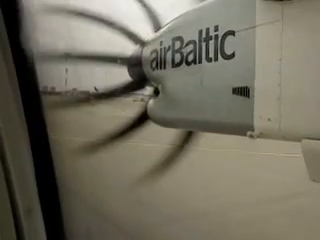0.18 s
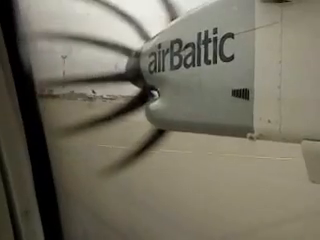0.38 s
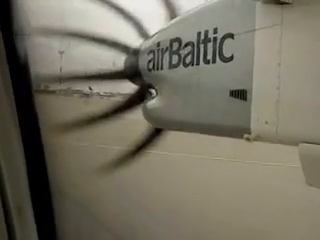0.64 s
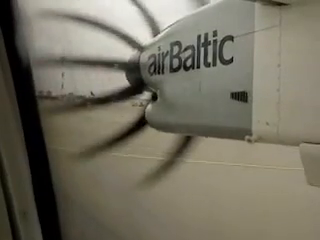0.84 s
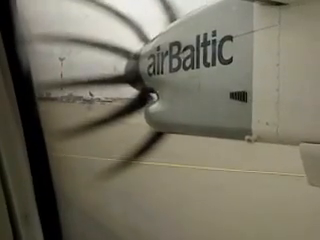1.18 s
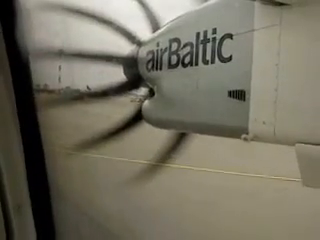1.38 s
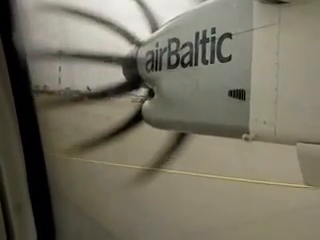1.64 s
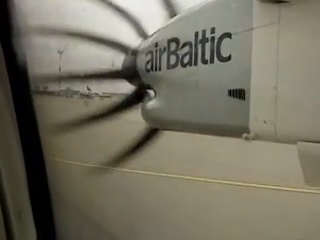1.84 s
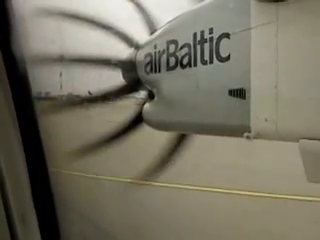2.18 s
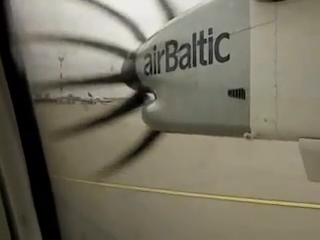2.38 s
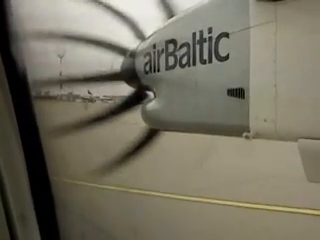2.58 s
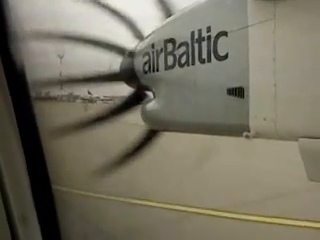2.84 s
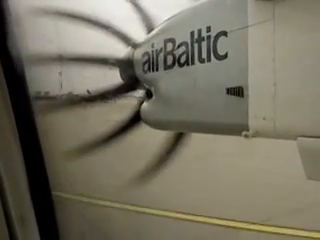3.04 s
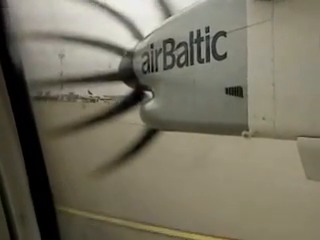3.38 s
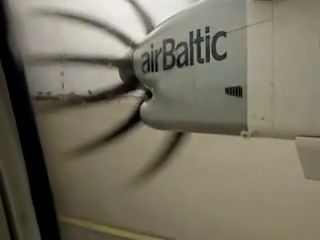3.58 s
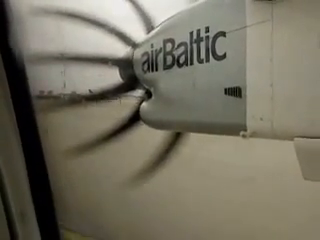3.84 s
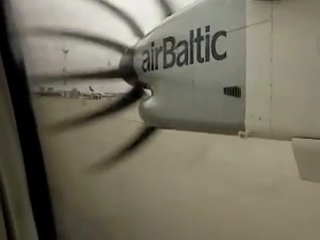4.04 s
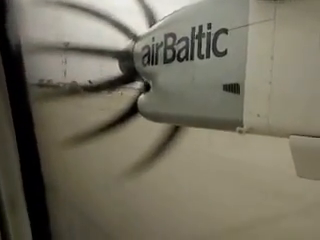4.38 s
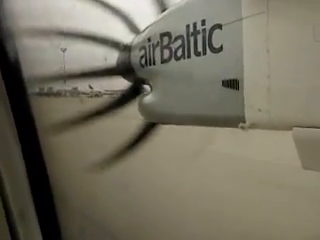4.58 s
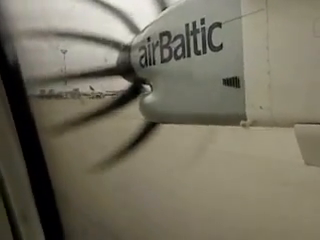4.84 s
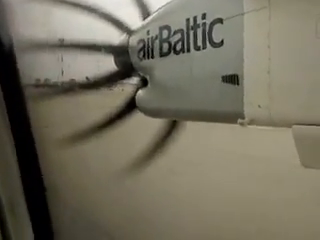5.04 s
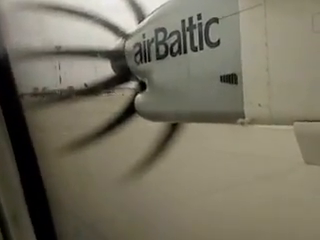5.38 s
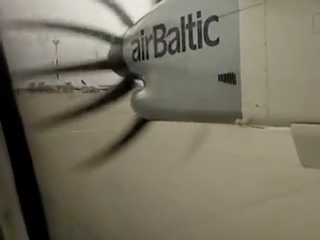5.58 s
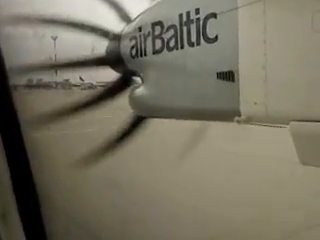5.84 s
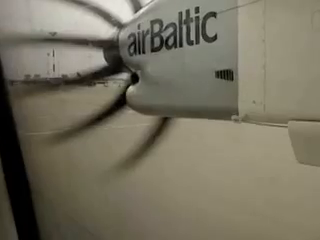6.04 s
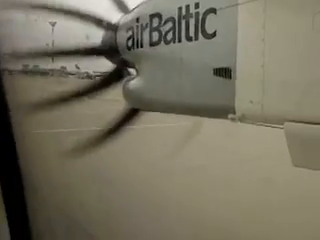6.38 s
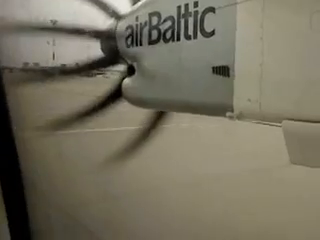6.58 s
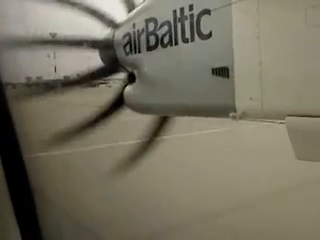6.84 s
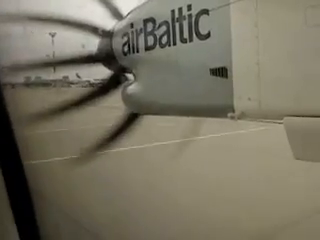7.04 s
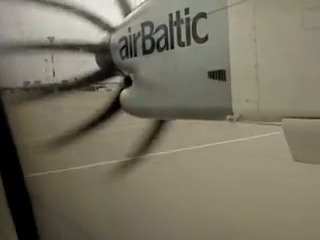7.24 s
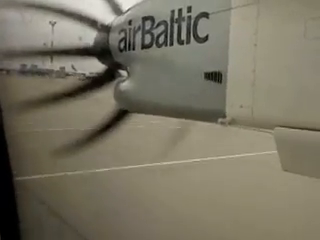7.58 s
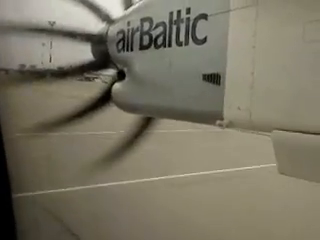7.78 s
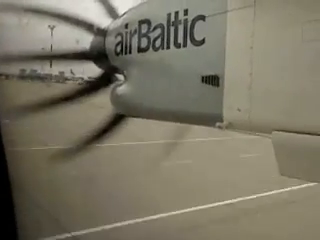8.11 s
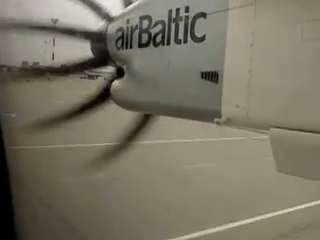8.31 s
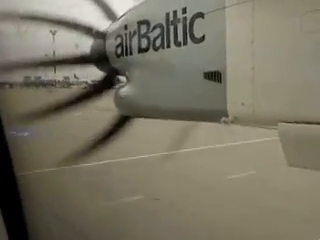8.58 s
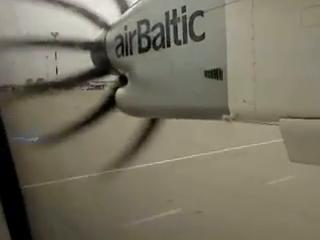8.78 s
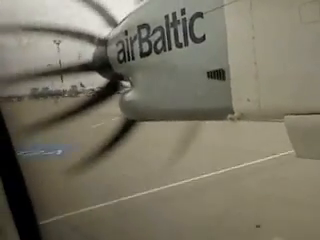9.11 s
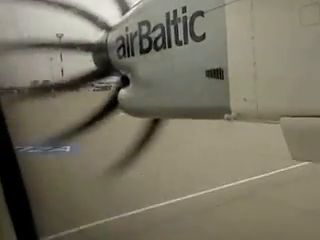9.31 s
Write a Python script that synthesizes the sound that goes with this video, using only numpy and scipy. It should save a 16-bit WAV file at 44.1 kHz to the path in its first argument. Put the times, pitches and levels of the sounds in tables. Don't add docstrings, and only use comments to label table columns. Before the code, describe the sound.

Heard from a window seat inside a taxiing turboprop, the propeller drones at low power through the wall. Its low hum surges and dips irregularly over a dull broadband cabin rush. Steady machinery tones and a thin whistle pulse quickly, flaring now and then. Faint plastic ticks and rustles occur close by, with one loud sharp click about halfway. The microphone is handheld in the cabin; the treble is dull and slightly watery.

```python
import sys
import numpy as np
from scipy import signal
from scipy.fft import rfft, irfft, next_fast_len
from scipy.io import wavfile

SR = 44100
rng = np.random.default_rng(int(sys.argv[2]) if len(sys.argv) > 2 else 0)


def materialize(psi):
    bounded = np.clip(np.atleast_2d(psi).T, -1, 1)
    quanta = np.round(bounded * 32767).astype(np.int16)
    wavfile.write(sys.argv[1], SR, quanta)


def boost_factor(decibels):
    exponent = np.asarray(decibels, float) / 20
    return 10 ** exponent


N = 415850

BLADE_HZ = 64.15
SHAFT_HZ = 9.01


def rms_one(x):
    return x / np.sqrt(np.mean(x ** 2) + 1e-20)


def in_time(times_s, values):
    return np.interp(np.arange(N) / SR, times_s, values)


def drift(rate_hz):
    r = np.exp(-80 * np.pi * rate_hz / SR)
    noise = rng.standard_normal(N // 40 + 2002)
    slow = signal.lfilter([1], [1, -2 * r, r * r], noise)[2000:]
    return np.interp(np.arange(N) / 40, np.arange(len(slow)), rms_one(slow))


def tone(hz, jitter_rad, rate_hz):
    phase = 2 * np.pi * (np.cumsum(hz * np.ones(N)) / SR + rng.random())
    return np.sqrt(2) * np.sin(phase + jitter_rad * drift(rate_hz))


def resonate(x, hz, width_hz):
    r = np.exp(-np.pi * width_hz / SR)
    zeros = [(1 - r * r) / 2, 0, (r * r - 1) / 2]
    poles = [1, -2 * r * np.cos(2 * np.pi * hz / SR), r * r]
    return signal.lfilter(zeros, poles, x)


def swell(rows, base):
    t, power = np.arange(0, N, 50) / SR, 0
    for s, db, length_s in rows:
        power = power + boost_factor(2 * db - 48 * ((t - s) / length_s) ** 2)
    return np.sqrt(in_time(t, power) + base ** 2)


def propeller():
    # (time [s], frequency [Hz], peak level [dB], length [s])
    gusts = [(0.06, 123.3, -17.5, 0.21), (0.46, 127.7, -14.5, 0.17), (0.77, 128.5, -15, 0.087),
             (0.92, 126.3, -19, 0.061), (1.44, 126.6, -18, 0.071), (1.59, 128.4, -16, 0.13),
             (1.92, 128, -19, 0.26), (2.06, 129, -28, 0.098), (2.37, 131.5, -19.5, 0.09),
             (2.87, 129, -18, 0.15), (3.28, 128.3, -21.5, 0.29), (3.44, 128.9, -21, 0.079),
             (3.63, 128.5, -19, 0.15), (4.07, 126.8, -17.5, 0.28), (4.36, 129.1, -16.5, 0.19),
             (4.61, 129.5, -14, 0.11), (4.93, 127, -21, 0.13), (5.42, 126.8, -16.5, 0.3),
             (5.66, 126.4, -19, 0.065), (5.91, 125, -20.5, 0.069), (6.22, 124.7, -19, 0.18),
             (6.49, 130.4, -18.9, 0.076), (6.9, 127.6, -15, 0.15), (7.47, 126.5, -15, 0.15),
             (7.8, 128.5, -16, 0.14), (7.98, 126.6, -18, 0.13), (8.25, 125.5, -18, 0.069),
             (8.37, 128.5, -17, 0.17), (9.19, 126.7, -17.5, 0.22), (9.31, 126.6, -19, 0.06)]
    # (time [s], multiple of blade rate [1], peak level [dB], length [s])
    harmonic_swells = [(0.29, 1, -34, 0.18), (0.34, 3, -25.5, 0.17), (0.76, 1, -29, 0.14), (1.56, 1, -31, 0.16),
                       (1.88, 3, -23.5, 0.19), (1.9, 1, -23, 0.18), (2.22, 1, -26.4, 0.17),
                       (2.43, 3, -24.9, 0.15), (2.62, 1, -27, 0.12), (2.85, 3, -27, 0.1), (3.25, 1, -26, 0.1),
                       (3.57, 1, -28, 0.08), (3.76, 1, -29, 0.17), (4.09, 1, -26, 0.14), (4.2, 3, -22, 0.1),
                       (4.54, 3, -21, 0.16), (4.79, 3, -23, 0.11), (5.02, 3, -25, 0.22), (5.55, 3, -23.3, 0.11),
                       (6.06, 3, -21.5, 0.15), (6.08, 1, -30, 0.2), (6.49, 3, -24, 0.25), (6.69, 1, -32.5, 0.3),
                       (6.86, 3, -24, 0.21), (7.37, 1, -35, 0.19), (7.68, 1, -28, 0.36), (7.87, 3, -25, 0.12),
                       (9.32, 3, -26, 0.13),
                       (0.21, 5, -24.5, 0.1), (0.467, 4, -22.5, 0.24), (1.104, 5, -21.5, 0.096),
                   (1.13, 4, -24, 0.11), (1.937, 5, -28, 0.23), (2.64, 4, -24, 0.26),
                   (2.76, 5, -24.5, 0.096), (2.81, 4, -26, 0.044), (3.074, 5, -22.7, 0.12),
                   (3.32, 5, -25.5, 0.12), (3.44, 4, -19, 0.094), (3.49, 5, -24, 0.097),
                   (3.88, 4, -19, 0.17), (4.251, 5, -24, 0.059), (4.75, 5, -24.0, 0.1),
                   (4.869, 4, -25, 0.26), (5.18, 5, -23.5, 0.084), (5.59, 4, -21, 0.12),
                   (5.75, 4, -22, 0.07), (6.15, 5, -21.5, 0.23), (6.36, 5, -25.5, 0.11),
                   (6.54, 4, -21.5, 0.2), (6.95, 4, -23, 0.058), (7.061, 5, -25.5, 0.08),
                   (7.241, 4, -20, 0.13), (7.25, 5, -22.0, 0.13), (7.516, 5, -24.5, 0.14),
                   (8.18, 4, -22.1, 0.11), (8.941, 4, -20, 0.088), (9.112, 4, -20, 0.099)]
    # (multiple of blade rate [1], level [dB])
    hum = [(1, -36.5), (3, -35), (4, -31), (5, -32)]
    # (multiple of blade rate
    # [1], width [Hz], level [dB])
    blurred = [(1, 6.1, -39), (2.002, 7.3, -34), (2.998, 7, -32.5), (4.001, 12, -31.5), (4.999, 14.0, -32),
               (5.85, 23, -32.5)]

    second_hz = in_time(*np.transpose(gusts)[:2])
    level = swell(np.delete(gusts, 1, axis=1), boost_factor(-26.5 + 2.3 * drift(4.3)))
    out = boost_factor(-1.0) * level * tone(second_hz, jitter_rad=0.22, rate_hz=2.5)
    for multiple, hum_db in hum:
        rows = [(s, db + 0.5, length_s) for s, m, db, length_s in harmonic_swells
                if m == multiple]
        level = swell(rows, boost_factor(hum_db + 3.6 * drift(4.0)))
        out += level * tone(multiple * BLADE_HZ, jitter_rad=0.9, rate_hz=4.0)
    for multiple, width_hz, db in blurred:
        haze = resonate(rng.standard_normal(N), multiple * BLADE_HZ, width_hz)
        haze = resonate(haze, multiple * BLADE_HZ, width_hz)
        out += boost_factor(db) * rms_one(haze)
    return out


def accessories():
    # (multiple of rotor rate [1], level [dB])
    rotor_tones = [(1, -42.5), (2, -21.5), (3, -30), (4, -34.5), (6, -39), (7, -50.5)]
    # (frequency [Hz], level [dB])
    pumps = [(72.0, -44), (90.0, -47), (98.9, -46), (152.8, -40), (157.5, -41), (173.6, -37), (271.2, -36),
             (495.0, -46), (624.1, -40), (1248.2, -52), (4004, -66)]

    rotor_hz, wobble_depth, wobble_lag_s = 80.95, 0.19, 0.048
    t = np.arange(N) / SR
    shaft_phase = 2 * np.pi * SHAFT_HZ * (t - wobble_lag_s) + 0.72 * drift(1.0)
    wobble = 1 + wobble_depth * np.cos(shaft_phase)
    slip_rad = 0.34 * drift(1.4)
    rotor = 0
    for multiple, db in rotor_tones:
        phase = multiple * (2 * np.pi * rotor_hz * t + slip_rad) + 2 * np.pi * rng.random()
        rotor = rotor + boost_factor(db + 0.77 * drift(2.5)) * np.sqrt(2) * np.sin(phase)
    steady = sum(boost_factor(db) * tone(hz, jitter_rad=0.5, rate_hz=0.13) for hz, db in pumps)
    return rotor * wobble + steady


def beat(lag_s, spread_db):
    first_beat_s, sharpness = 0.006, 1.4
    turns = SHAFT_HZ * (np.arange(N) / SR - first_beat_s - lag_s)
    pulse = np.exp(sharpness * (np.cos(2 * np.pi * turns) - 1))
    return boost_factor(spread_db * drift(5.0)) * pulse


def whistle():
    # (time [s], peak level [dB])
    flares = [(0.15, -30.8), (0.23, -25), (0.33, -21.5), (0.45, -23), (1.15, -25), (1.37, -29), (1.55, -26),
              (1.88, -26), (2.14, -21), (2.33, -22), (2.55, -24.5), (2.78, -21), (3.22, -23), (4.33, -23),
              (4.55, -31), (4.7, -21), (4.77, -27), (5.1, -27), (5.21, -30.7), (6.32, -28), (6.43, -30),
              (6.99, -27), (7.46, -23), (7.66, -21), (7.99, -28), (8.1, -22.5), (8.32, -27), (8.65, -28),
              (8.77, -24), (8.99, -33)]
    # (frequency [Hz], level [dB], lag [s], spread between turns [dB])
    whistles = [
        (595, -40, -.03, 3),
        (804, -37, .014, 0.5),
    ]

    flare_s = 0.052
    rows = [(s, db - 5.0, flare_s) for s, db in flares]
    level = swell(rows, boost_factor(-33.5) * beat(0, spread_db=1.5))
    out = level * tone(953, jitter_rad=0.8, rate_hz=8.0)
    for hz, db, lag_s, spread_db in whistles:
        out += boost_factor(db) * beat(lag_s, spread_db) * tone(hz, jitter_rad=1.5, rate_hz=10.5)
    return out


def ticks():
    # (time [s], peak level [dB], decay by 60 dB [s], share of sharp crack [1], rise [s])
    impacts = [
        (.632, -39, .05, .4, 0.0022),
        (.996, -32.5, .2, 0.4, 0.0034),
        (1.028, -49, 0.1, .3, 0.0035),
        (2.455, -34.5, 0.25, 0.2, 0.011),
        (2.662, -37, .1, 0, 0.0055),
        (5.052, -12, 0.079, 0.75, 0.0026),
        (5.067, -26, 0.12, 0.5, 0.0031),
        (8.57, -39, 0.16, 0.15, .01),
    ]
    # (frequency [Hz], level [dB], decay by 60 dB [s])
    part_modes = [(1700, -11, .03), (2400, -8, .06), (3250, -9, .035), (4150, -11, .035), (5050, -13, .035),
                  (6700, -19, .04), (7450, -18, .06)]

    age, out = np.arange(SR // 5) / SR, np.zeros(N + SR)
    band = signal.butter(2, [1100, 7000], "band", fs=SR, output="sos")
    for s, db, t60, crack, rise_s in impacts:
        noise = signal.sosfilt(band, rng.standard_normal(len(age)))
        decay = crack * boost_factor(-60 * age / 0.012) + (1 - crack) * boost_factor(-60 * age / t60)
        burst = 2 * noise * decay
        for hz, mode_db, ring_s in part_modes:
            ring = boost_factor(mode_db - 60 * age / ring_s) * np.sin(2 * np.pi * (hz * age + rng.random()))
            burst += crack * ring
        at = round(s * SR)
        out[at:at + len(age)] += boost_factor(db) * burst * np.minimum(age / rise_s, 1)
    return out[:N]


def rush():
    # (time [s], level [dB], heard relative to the median)
    rush_levels = [(0.0, -35.5), (0.21, -35), (0.55, -36), (1.15, -34.5), (2.15, -36), (2.49, -35),
                   (4.31, -36), (4.41, -35), (5.62, -35.5), (5.85, -33.5), (6.07, -35), (8.51, -36),
                   (8.77, -34), (9.43, -35)]
    # (frequency [Hz], spectral level [dB per Hz])
    colour = [(12, -48), (20, -22), (81, -11.5), (159, -4.5), (209, -9), (249, -7), (390, -5), (539, -15),
              (803, -15), (866, -17.5), (957, -16.5), (1200, -24), (2530, -30.5), (4840, -42.5),
              (7780, -54), (10100, -89.5), (17100, -120)]
    cabin_hz = [142, 285, 352, 487, 530, 564, 577, 590, 666, 705, 798, 862, 885, 953, 993, 1023, 1045, 1095,
                1195, 1290, 1336, 1515, 1595, 2600, 2950, 4750, 5695, 6450, 7010, 7950]
    # (width [Hz], peak level [dB], negative = notch)
    cabin_peaks = [(9.9, 0.5), (24.3, -8.5), (11, -5.5), (25, 4.5), (35, -3), (11.9, 4.5), (8.04, -1.5),
                   (12, 7.5), (21.6, 6), (29.5, -3.5), (30.8, 5.5), (30, -3), (14.6, 6), (34.6, 4.5),
                   (30.4, 2.5), (13, -4.5), (31.2, 5.5), (59.3, 3.5), (25, -1.5), (25.3, 0), (50.3, 3.5),
                   (49.6, 5), (50, 1), (420, 2), (347, -3.5), (396, 3), (55, 7), (505, -1.5), (147, 8),
                   (300, 7.5)]

    size = next_fast_len(N)
    hz = np.maximum(np.arange(size // 2 + 1) * SR / size, 1)
    colour_hz, colour_db = np.transpose(colour)
    db = np.interp(np.log(hz), np.log(colour_hz), colour_db)
    for centre_hz, (width_hz, peak_db) in zip(cabin_hz, cabin_peaks):
        db = db + peak_db / (1 + (2 * (hz - centre_hz) / width_hz) ** 2)
    coloured = rfft(rng.standard_normal(size)) * boost_factor(db)
    upper_share = 1 / (1 + (900 / hz) ** 4)
    low = irfft(coloured * (1 - upper_share), size)[:N]
    high = irfft(coloured * upper_share, size)[:N]
    swell_db = in_time(*np.transpose(rush_levels))
    swell_db = swell_db - np.median(swell_db)
    high = high * boost_factor(swell_db + 0.65 * drift(5.9))
    return boost_factor(-19) * rms_one(low * boost_factor(1.2 * swell_db) + high)


def scene():
    return (propeller() + accessories() + whistle() + ticks() + rush())[None]


def narrow_channel(x):
    # (frequency [Hz], step level [dB])
    step_levels = [(100, -42), (3000, -44), (4700, -41), (5300, -35.5), (5700, -37.6), (6500, -41.7),
                   (7000, -42), (7500, -42.5), (8000, -45.5)]

    frame, start = 1024, 150
    fast, slow = 441 * frame, 160 * frame
    samples = irfft(rfft(x, fast)[:slow // 2 + 1], slow) * slow / fast
    samples = np.pad(samples, (frame - start, frame + start))
    n, k = np.arange(2 * frame)[:, None], np.arange(frame) + 0.5
    window = signal.windows.kaiser_bessel_derived(2 * frame, 4 * np.pi)[:, None]
    basis = window * np.cos(np.pi / frame * (n + 0.5 + frame / 2) * k) * np.sqrt(2 / frame)
    frames = np.lib.stride_tricks.sliding_window_view(samples, 2 * frame)[::frame].copy()
    lines = frames @ basis

    step_hz, step_db = np.transpose(step_levels)
    per_band_db = np.repeat(rng.standard_normal((len(lines), 16)), frame // 16, axis=1)
    step = boost_factor(np.interp(k * 8000 / frame, step_hz, step_db) + per_band_db)
    whole = np.floor((np.abs(lines) / step) ** 0.75 + 0.4054)
    rounded = np.sign(lines) * step * whole ** (4 / 3)

    halves = (rounded @ basis.T).reshape(-1, 2, frame)
    overlapped = (halves[1:, 0] + halves[:-1, 1]).ravel()
    back = np.concatenate([halves[0, 0], overlapped])
    spectrum = rfft(back[frame - start:][:slow])
    imaged = np.concatenate([spectrum, np.conj(spectrum[-2::-1])])
    hz = np.arange(len(imaged)) * SR / fast
    cutoff_hz, slope_hz = 8000, 26
    imaged = imaged / (1 + np.exp(np.minimum((hz - cutoff_hz) / slope_hz, 50)))
    return irfft(imaged, fast)[:N] * fast / slow


def roll_off(x):
    return signal.sosfilt(signal.butter(12, 15500, fs=SR, output="sos"), x)


def record(dry):
    soft = np.tanh(dry) * 0.95
    mix = narrow_channel(soft[0]) + boost_factor(-99) * rng.standard_normal(N)
    return roll_off(mix[None])


dry = scene()
out = record(dry)
materialize(out)
```